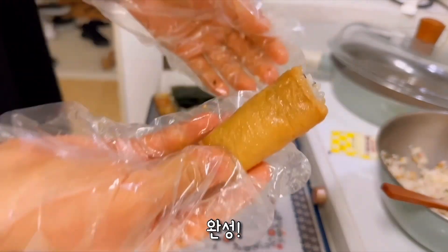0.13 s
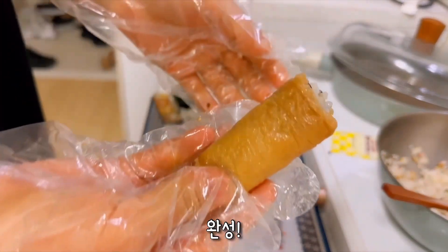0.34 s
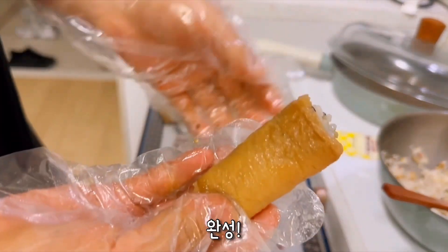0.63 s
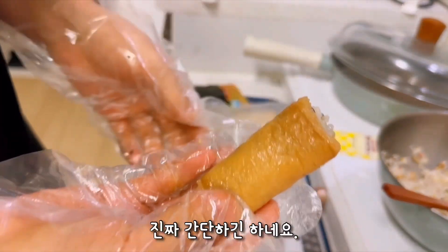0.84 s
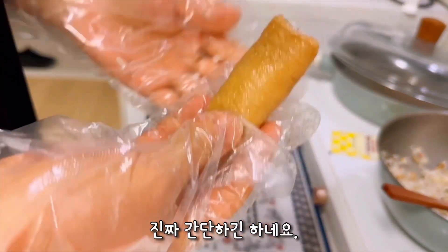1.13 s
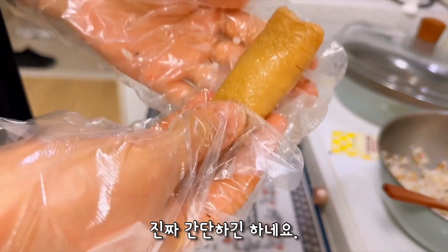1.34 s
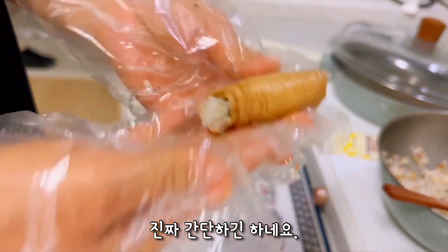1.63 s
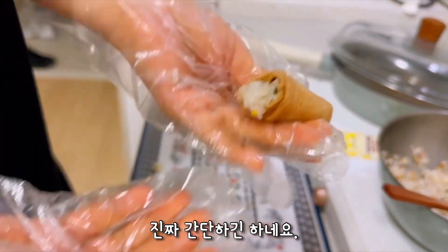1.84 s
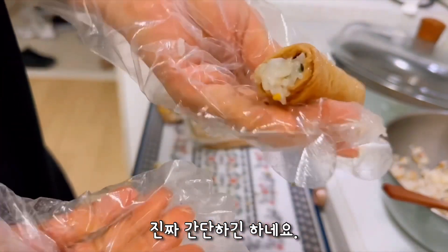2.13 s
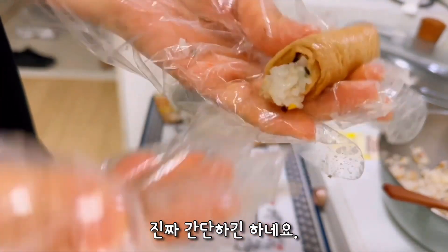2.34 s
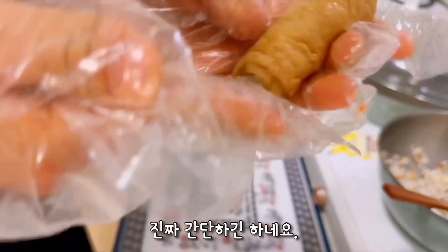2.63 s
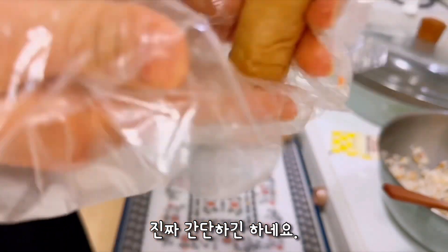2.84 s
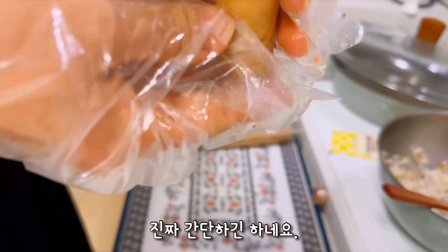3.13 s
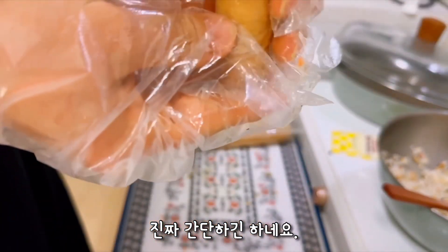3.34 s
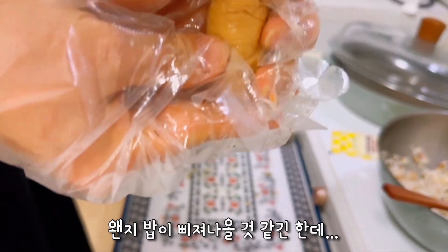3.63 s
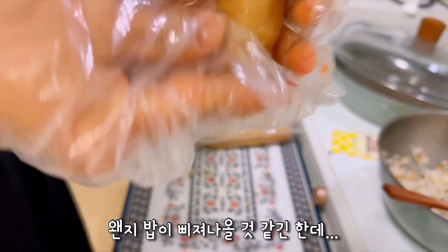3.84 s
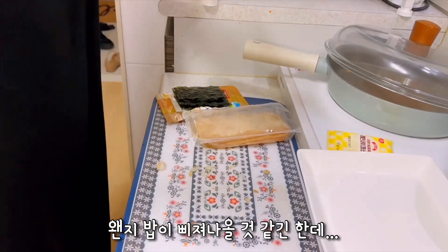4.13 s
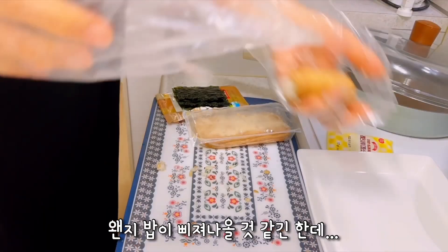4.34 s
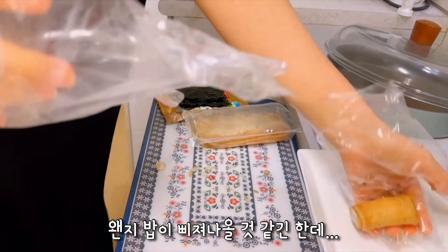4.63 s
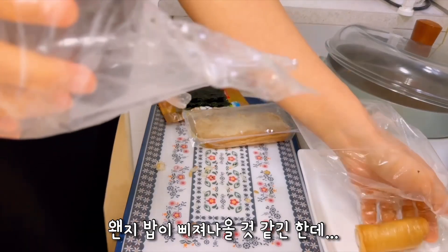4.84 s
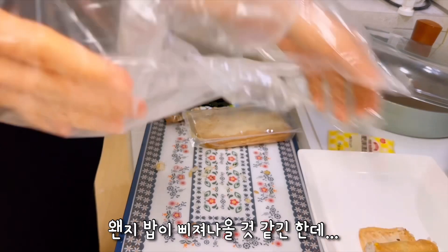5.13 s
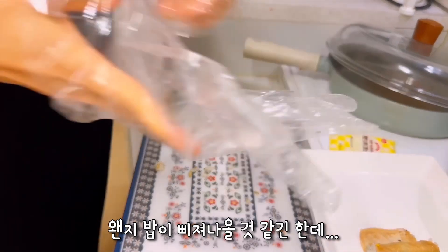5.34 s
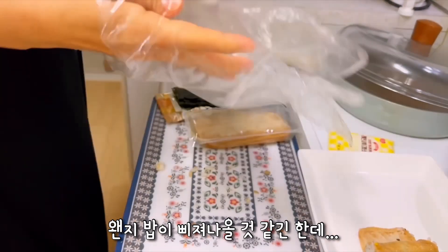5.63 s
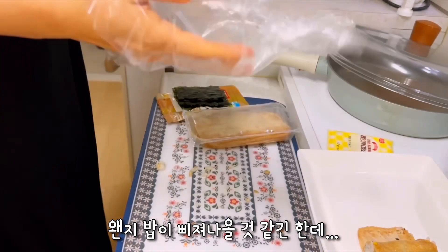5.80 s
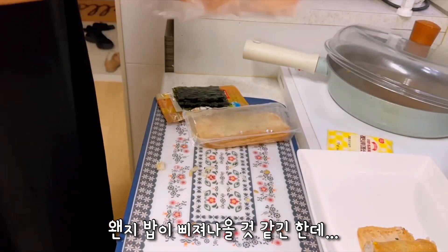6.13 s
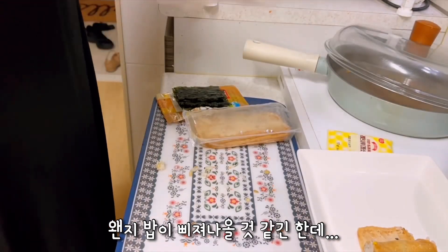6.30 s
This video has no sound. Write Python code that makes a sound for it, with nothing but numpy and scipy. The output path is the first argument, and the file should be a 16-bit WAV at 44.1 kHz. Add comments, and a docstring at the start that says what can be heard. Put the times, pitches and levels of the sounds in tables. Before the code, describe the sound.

Faint low hum, almost alone at first; then close, dry crinkling of disposable gloves in quick uneven strokes, with tiny clicks, sliding hiss, sharp snaps and soft low pats in the palm. Handling thins out past four seconds, a muffled double set of bumps lands on a plate, and the film rustles and flaps louder again. Short room reverberation, wide stereo leaning slightly left.

```python
"""A small kitchen: hands in thin plastic gloves turn a food roll close to the microphone and set it on a plate.
Buckling film sounds as swarms of tiny resonant clicks, with a sliding hiss, and as single sharp snaps;
wide folds rustle, loose folds flap, and damped low tones are the roll dropping against a palm.
The plate answers with two dull groups of bumps, built from decaying modes and short noise slaps.
A low hum of coloured noise lasts throughout; the walls return a short diffuse tail."""
import sys
import numpy as np
from scipy import signal
from scipy.fft import rfft, irfft
from scipy.io import wavfile
from scipy.ndimage import uniform_filter1d

SR = 44100
rng = np.random.default_rng(int(sys.argv[2]) if len(sys.argv) > 2 else 0)


def bounce(signal):
    """Save signal as a 16-bit WAV file at the path given by the first command-line argument."""
    frames = np.transpose(np.atleast_2d(signal))
    limited = np.clip(frames, -1, 1)
    pcm = np.round(limited * 32767).astype(np.int16)
    wavfile.write(sys.argv[1], SR, pcm)


N = 284886
TIME = np.arange(N) / SR
HZ = np.maximum(np.fft.rfftfreq(N, 1 / SR), 1)
USUAL_CRACKLE_DB, USUAL_FOLDS_DB = -44, -45   # levels at the usual pace of handling
HANDLING_FROM_S = 0.9   # until then the roll is held almost still


def from_db(db):
    """Level definition: decibels to amplitude gain."""
    return 10 ** (np.asarray(db) / 20)


def rms_one(x):
    """Normalisation: scale to unit mean power."""
    return x / np.sqrt(np.mean(x ** 2) + 1e-20)


def at_hz(points):
    """Logarithmic frequency scale: interpolate a table along log frequency."""
    hz, value = np.transpose(points)
    return np.interp(np.log(HZ), np.log(hz), value)


def colour(x, spectrum):
    """Linear filtering: multiply the spectrum by a smooth gain."""
    return irfft(rfft(x) * from_db(at_hz(spectrum)), N)


def drift(knots_per_s):
    """Random modulation: straight lines between random knots, at unit power."""
    knots = rng.standard_normal(4000)
    return rms_one(np.interp(TIME * knots_per_s, np.arange(len(knots)), knots))


def pan(left_over_right_db):
    """Intensity stereophony: left and right gains of constant power."""
    halves_db = np.array([[left_over_right_db], [-left_over_right_db]]) / 2
    return rms_one(from_db(halves_db))


def stereo_noise(side_db):
    """Partial coherence: white noise with a common part and an opposed part."""
    mid, side = rng.standard_normal((2, N))
    return rms_one(mid + from_db(side_db) * side * np.array([[1], [-1]]))


def resonate(x, hz, width_hz):
    """Simple resonance: a pole pair with gain 1 at the peak."""
    radius = np.exp(-np.pi * width_hz / SR)
    angle = 2 * np.pi * min(hz, SR / 2) / SR
    zeros = np.array([1, 0, -1]) * (1 - radius * radius) / 2
    poles = [1, -2 * radius * np.cos(angle), radius * radius]
    return signal.lfilter(zeros, poles, x + 1e-18)


def patch_ring(x, hz, damping):
    """Cascaded resonance: a patch of film radiates one band with steep flanks."""
    return resonate(resonate(x, hz, damping * hz), hz, damping * hz)


def buckling(per_s, pace, slide_db, low_hz, high_hz, spectrum, spread_db, scatter_db, order=14):
    """Snap-through instability: a swarm of clicks rings film patches; short-term level is held near 1."""
    chance = per_s * pace * from_db(4 * drift(60)) / SR
    born = np.flatnonzero(rng.random(N) < chance)
    draws = rng.random((N, 4))[born]
    size_db = spread_db * np.minimum(-np.log(draws[:, 0]), 4)
    sizes = from_db(size_db) * np.sign(draws[:, 1] - .5)
    sizes = sizes * np.minimum(pace[born] / .5, 1)   # slow film buckles only gently
    patch = (draws[:, 2] * order).astype(int)
    grains = np.zeros((2, N))
    for k, hz in enumerate(np.geomspace(low_hz, high_hz, order)):
        clicks, mine = np.zeros((2, N)), patch == k
        side = from_db(scatter_db) * (2 * draws[mine, 3] - 1)   # each facet faces its own way
        clicks[:, born[mine]] = sizes[mine] * np.array([1 + side, 1 - side])
        grains += patch_ring(clicks, hz, damping=.7)
    # film sliding on film adds a smooth hiss between the clicks
    hiss = rms_one(colour(stereo_noise(scatter_db - 2.5), spectrum))
    hiss = from_db(slide_db) * np.sqrt(np.clip(pace, .1, 1)) * hiss
    film = rms_one(colour(grains, spectrum)) + hiss
    power = uniform_filter1d(np.mean(film ** 2, axis=0), size=1100)   # over 25 ms
    return film / np.sqrt(power + 1e-9)


# hum spectrum: f/Hz, relative level/dB per Hz
HUM_SPECTRUM = [(15, -38), (30, -14), (50, -1), (70, -1.5), (98, 1), (130, -9), (220, -21.5), (400, -25),
                (1000, -36.5), (2400, -37), (5000, -45), (9000, -53), (16000, -73)]


def hum():
    """Stationary random noise: a steady, mostly coherent, low-frequency spectrum."""
    hum_db = -62
    return from_db(hum_db) * pan(1.6) * rms_one(colour(stereo_noise(-15.5), HUM_SPECTRUM))


# strokes of the hands, each working the film for a moment:
# start t/s, held t/s, crackle level/dB, wide-fold level relative to the crackle/dB
HAND_STROKES = [(0.062, 0.0099, -67.5, -24), (0.925, 0.061, -68, -1), (1.024, 0.011, -46, -9.5),
                (1.218, 0.0063, -48.5, -7), (1.393, 0.13, -42, -9.5), (1.635, 0.062, -43.5, -7.5),
                (1.735, 0.04, -48, -8), (1.842, 0.028, -54.5, -8.5), (2.085, 0.078, -62, -0.5),
                (2.214, 0.073, -48, -8), (2.349, 0.2, -44.5, -7.5), (2.611, 0.0096, -51.5, -2.5),
                (2.744, 0.13, -48.5, -4), (2.941, .015, -48.5, -10), (3.051, .04, -42, -10),
                (3.147, 0.17, -45.5, -5.5), (3.366, 0.089, -51.5, -5.5), (3.526, 0.026, -48, -7),
                (3.681, 0.14, -48.5, -8), (3.827, 0.065, -39, -8.5), (3.998, 0.067, -39, -4.5),
                (4.1, 0.037, -48, -4), (4.17, .1, -54, -4), (4.419, 0.081, -61, 0),
                (4.651, .26, -52.5, -4.5), (4.96, 0.08, -57.5, -1.5), (5.084, .17, -51, -4),
                (5.384, 0.069, -48, -3), (5.454, 0.047, -43.5, -9), (5.591, 0.053, -52, -3.5),
                (5.727, 0.053, -38, -7), (5.834, 0.13, -50, -0.5), (5.939, .075, -43, -7),
                (6.106, 0.028, -41.5, -5), (6.211, 0.011, -47.5, -7), (6.309, 0.097, -35.5, -9.5)]


def handling():
    """Energy summation: strokes build, hold and settle; returns fine-crackle and wide-fold levels in dB."""
    grip_db_per_s, settle_db_per_s = 250.5, 170.5   # a stroke builds quickly; the film settles more slowly
    busy = TIME > HANDLING_FROM_S
    # faint film noise between strokes
    fine = from_db(np.where(busy, -68.5, -90)) ** 2
    wide = from_db(np.where(busy, -72, -75.5)) ** 2
    for start, held, level_db, folds_db in HAND_STROKES:
        before_db = grip_db_per_s * (start - TIME)
        after_db = settle_db_per_s * (TIME - start - held)
        down_db = np.clip(np.maximum(before_db, after_db), 0, 100)
        power = from_db(level_db - down_db) ** 2
        fine = fine + power
        wide = wide + power * from_db(folds_db) ** 2
    return 10 * np.log10([fine, wide])


# how the hands are held: t/s, ring of the cupped palms level/dB,
# top treble facing the microphone level/dB, smooth sliding against buckling level/dB
HAND_POSE = [(0, -10, -1, -3), (.9, -5, -13, -7), (1.6, 2, -7.5, -4), (2.4, -6, -7.5, -12.5),
             (3.0, -3, -8, -7), (3.2, 6, -4, -7.5), (3.5, 8, -11, -4), (3.8, 6.5, -2, -4),
             (4.75, -26, -27, 6), (5.2, -9, -7, -1), (5.8, -1.5, -6, 0), (6.46, 5.5, -8, 3.5)]


def pose():
    """Linear interpolation: palm ring, facing and sliding levels at every sample."""
    s, *columns = np.transpose(HAND_POSE)
    return [np.interp(TIME, s, column) for column in columns]


# fine-facet spectrum: f/Hz, relative level/dB per Hz
CRACKLE_SPECTRUM = [(1500, -7.5), (2600, 1.5), (5500, -2.5), (8000, -3), (10400, 1), (12500, -1),
                    (15000, 2), (16500, -65)]


def crackle(crackle_db, pace, slide_db, facing_db):
    """Directivity: fine facets beam their top treble, so it comes and goes as the film turns."""
    film = buckling(1500, pace, slide_db, 2380, 16700, CRACKLE_SPECTRUM, spread_db=2.1, scatter_db=-3)
    film = from_db(crackle_db) * film
    above_10_khz = signal.butter(2, 10000, "high", fs=SR, output="sos")
    top = signal.sosfiltfilt(above_10_khz, film)
    return film + (from_db(facing_db + 2 * drift(25)) - 1) * top


# wide-fold spectrum: f/Hz, relative level/dB per Hz
RUSTLE_SPECTRUM = [(300, -29), (520, 3), (850, 2), (1150, 2.5), (1650, -2.5), (2200, -6), (3200, -13.5)]


def rustle(folds_db, pace, slide_db, cupped_db):
    """Cavity resonance: wide folds buckle lower in pitch, and the cupped palms ring with them."""
    film = buckling(1300, pace, slide_db, 477, 2740, RUSTLE_SPECTRUM, spread_db=3.0, scatter_db=-1.0, order=10)
    film = from_db(folds_db - 3.5) * film
    return film + from_db(cupped_db) * resonate(film, hz=1676, width_hz=370)


# loose-flap spectrum: f/Hz, relative level/dB per Hz
FLAP_SPECTRUM = [(22, -26), (50, 5), (130, 1), (300, -1), (450, -4), (750, -33)]


def flap(folds_db, pace, slide_db):
    """Size scaling: large loose flaps buckle sparsely in low-frequency patches."""
    follows = 0.98   # share of the folds' swing about their usual level
    flap_db = USUAL_FOLDS_DB + follows * (folds_db - USUAL_FOLDS_DB)
    film = buckling(400, pace, slide_db, 49.5, 510, FLAP_SPECTRUM, spread_db=2.5, scatter_db=-6, order=10)
    return from_db(flap_db - 3) * film


# sharpest creases snapping through:
# t/s, relative level over 1 ms/dB, nominal f/Hz, decay time of the slips/ms
SHARP_CREASES = [(0.212, -48, 3300, 3), (0.5496, -63, 2600, 2.3), (0.655, -67, 7000, 1.7),
                 (0.9016, -48, 7700, 2.1), (1.0169, -30.5, 5800, 1.7), (1.1076, -42, 7300, 2.1),
                 (1.182, -43.5, 5500, 2.3), (1.2245, -34.5, 4770, 1), (1.2651, -45, 6470, 1.9),
                 (1.4047, -36, 7000, .6), (1.53, -32.5, 7550, 1.4), (1.573, -35.5, 6800, 1.3),
                 (1.8376, -36, 10200, 0.96), (1.8876, -43, 5000, 0.65), (1.9184, -45.5, 3650, 1.2),
                 (1.9564, -48.5, 5830, 3.8), (2.0245, -42, 6100, 2), (2.0514, -40.5, 8500, 0.96),
                 (2.1337, -45, 4150, 3.1), (2.198, -35, 8160, 2.1), (2.2049, -30.5, 9000, .4),
                 (2.239, -31, 9600, 0.51), (2.3034, -39, 5170, 1.5), (2.3295, -33.5, 9300, 0.35),
                 (2.3544, -30.5, 7300, 2.5), (2.3958, -25.5, 7040, 0.52), (2.4555, -32, 9500, 0.43),
                 (2.539, -31.5, 6000, 0.28), (2.621, -30.5, 10100, 0.24), (2.6408, -37.5, 3840, 1.9),
                 (2.7387, -37.5, 6560, 1.2), (2.8917, -35, 7200, 2.6), (2.942, -35.5, 8600, 1),
                 (2.9481, -38, 4800, 3), (3.0214, -43, 5050, 0.62), (3.0313, -30.5, 8300, 1.4),
                 (3.0937, -31.5, 6300, 0.51), (3.177, -29, 8850, 1.45), (3.255, -30.5, 10300, 0.34),
                 (3.2933, -32, 7800, 1), (3.318, -29.5, 8800, 0.46), (3.363, -37.5, 1610, 0.67),
                 (3.3972, -32.5, 9250, 0.49), (3.5793, -38.5, 7900, 1.6), (3.6509, -38.5, 2430, 2.3),
                 (3.6867, -32.5, 7800, 1.5), (3.9014, -30.5, 7100, 2.2), (3.9605, -32.5, 7850, .55),
                 (3.9905, -22.5, 7600, 1.16), (4.0386, -33, 7300, 2), (4.221, -42, 7700, 1.3),
                 (4.289, -43.5, 7500, 3.6), (4.419, -49, 4080, 1.9), (4.4925, -45.5, 1300, 0.45),
                 (4.7441, -24, 7240, 0.19), (4.842, -41.5, 2060, 4), (5.1122, -38.5, 7000, 1.7),
                 (5.1384, -40, 6440, 1), (5.199, -39, 6240, 2.1), (5.2964, -40, 10900, 1.8),
                 (5.3425, -42.5, 5850, 1.6), (5.3928, -36.5, 7500, 1.1), (5.458, -34, 1930, 3.8),
                 (5.7278, -24.5, 9250, 1.9), (5.7584, -26, 8900, 0.57), (6.1466, -34, 6300, 2.5),
                 (6.2042, -35.5, 7600, 2.7), (6.311, -29, 7090, 0.75)]


def snaps(lesser, fold_db, knock_db, scatter_db, scatter_s):
    """Stick-slip excitation: a brief run of slips rings the film; the hands scatter the sound at once."""
    ring_ratio, raise_db = 1.102, 2.0   # film ring against nominal pitch; gain of all snaps
    out, t = np.zeros((2, N)), TIME[:700]
    for s, level_db, hz, length_ms in [*SHARP_CREASES, *lesser]:
        slips = rms_one(rng.standard_normal(len(t)) * np.exp(-t / (length_ms / 1000)))
        scattered = rms_one(rng.standard_normal((2, len(t))) * np.exp(-t / scatter_s))
        slips = slips + from_db(scatter_db) * scattered
        # a longer run of slips also shakes the fold around the crease and the whole glove
        fold = from_db(fold_db) * rms_one(resonate(slips, .5 * hz, 0.2 * hz))
        knock = from_db(knock_db) * rms_one(patch_ring(slips, 1510, damping=1.0))
        snap = rms_one(patch_ring(slips, hz * ring_ratio, damping=.85))
        snap = snap + length_ms * (fold + knock)
        # small bright creases tend towards the middle, larger and duller ones further left
        side_db = 1.5 + 1.5 * np.log2(7500 / hz) + rng.standard_normal()
        over_1_ms = np.sqrt(SR / 1000 / len(t))   # the energy of 1 ms at the stated level
        at = round(s * SR)
        out[:, at:at + len(t)] += pan(side_db) * from_db(level_db) * rms_one(snap) * over_1_ms
    return from_db(raise_db) * out


def small_creases(crackle_db, per_s, above_db, spread_db):
    """Random point process: lesser creases as rows like the sharp ones, level following the crackle."""
    chance, size, pitch, length = rng.random((round(per_s * N / SR), 4)).T
    s = chance * (N - SR // 50) / SR
    around_db = np.interp(s, TIME, crackle_db)
    # gentle handling leaves the creases standing further out of the crackle
    gentle_db = -.15 * (around_db - USUAL_CRACKLE_DB)
    level_db = around_db + above_db + spread_db * size ** 2 + gentle_db
    rows = np.transpose([s, level_db, 3000 * 3.2 ** pitch, 0.24 + 3.36 * length])
    return rows[s > HANDLING_FROM_S]


# the roll drops softly against a palm: t/s, level/dB, f/Hz
PALM_PATS = [(2.355, -41, 198), (2.361, -46, 70), (2.865, -42.5, 190), (2.877, -40, 98),
             (2.914, -44.5, 170), (4.001, -39, 70), (4.055, -36.5, 120), (4.418, -48, 342),
             (4.931, -38, 223), (5.74, -37, 159), (5.915, -39, 205), (6.140, -37, 100)]


def pats(ring_s):
    """Heavy damping: flesh lets each low tone swell and die within a few cycles."""
    out, t = np.zeros(N), TIME[:SR // 8]
    for s, level_db, hz in PALM_PATS:
        at = round(s * SR)
        swell = t / ring_s * np.exp(1 - t / ring_s)   # peaks at 1 after ring_s
        out[at:at + len(t)] += from_db(level_db) * swell * np.sin(2 * np.pi * hz * t)
    return out


# roll and fingers meet the plate: t/s, thud level/dB, slap level/dB
PLATE_BUMPS = [(4.649, -50, -42), (4.654, -35, -59), (4.666, -39.5, -57), (4.698, -48, -66),
               (4.909, -48, -43), (4.922, -47, -34), (4.933, -36, -56), (4.976, -37, -51),
               (5.018, -45.5, -57), (5.066, -58, -49)]
# modes of the plate on the counter: f/Hz, relative level/dB, 60 dB decay time t/s
PLATE_MODES = [(217.2, -2.5, 0.18), (252, -8, 0.21), (266.1, 3.5, 0.14), (287, 1, 0.16), (390, -10, 0.084),
               (740, -17, 0.035), (917, -11, 0.049)]
# slap spectrum: f/Hz, relative level/dB per Hz
SLAP_SPECTRUM = [(150, -4.5), (400, 0), (750, 3), (1050, -2), (1500, -13.5), (4000, -45), (12000, -41)]


def plate(contact_s, slap_s):
    """Modal superposition: soft blows ring the plate's low modes, each with a short moist slap."""
    thuds, slaps = np.zeros(N), np.zeros(N)
    for s, thud_db, slap_db in PLATE_BUMPS:
        at = round(s * SR)
        t = TIME[:N - at][:SR // 2]
        ring = sum(from_db(db - 60 * t / t60) * np.sin(2 * np.pi * hz * t) for hz, db, t60 in PLATE_MODES)
        soft_onset = 1 - np.exp(-t / contact_s)
        thuds[at:at + len(t)] += from_db(thud_db) * ring * soft_onset
        slaps[at:at + len(t)] += from_db(slap_db) * np.exp(-t / slap_s)
    slap_noise = rms_one(colour(stereo_noise(-7.5), SLAP_SPECTRUM))
    return pan(2.4) * (thuds + slaps * slap_noise)


def kitchen(x, room_db, t60_s, order=8):
    """Diffuse-field decay: in each band, noise follows the dying energy returned by the walls."""
    edges, tail = np.geomspace(300, 16000, order + 1), 0
    keep = from_db(-120 / (t60_s * SR))   # energy, so 60 dB down after t60_s
    white = rng.standard_normal((2, N))
    for low, high in zip(edges, edges[1:]):
        band = signal.butter(2, [low, high], "band", fs=SR, output="sos")
        power = np.mean(signal.sosfilt(band, x) ** 2, axis=0)
        energy = signal.lfilter([1 - keep], [1, -keep], power)
        white = np.roll(white, SR // 2, axis=1)
        noise = rms_one(signal.sosfilt(band, white))
        tail = tail + np.sqrt(energy) * noise / np.hypot(1, low / 9000)   # weaker in the treble
    return x + from_db(room_db) * tail


def scene():
    """Superposition: faster handling makes the film louder and denser in clicks."""
    jerks_db = 1.2 * drift(45)   # the film catches and lets go
    crackle_db, folds_db = handling() + jerks_db
    cupped_db, facing_db, slide_db = pose()
    pace = from_db(.6 * (crackle_db - USUAL_CRACKLE_DB))
    fine = pan(0.9) * crackle(crackle_db, pace, slide_db, facing_db)
    wide = pan(4.5) * rustle(folds_db, pace, slide_db, cupped_db)
    low = pan(3.5) * (flap(folds_db, pace, slide_db) + pats(ring_s=0.0036))
    lesser = small_creases(crackle_db, per_s=32, above_db=4, spread_db=6)
    creases = snaps(lesser, fold_db=-8, knock_db=-16, scatter_db=-7, scatter_s=.005)
    sources = fine + wide + low + creases + plate(contact_s=0.0071, slap_s=0.0086)
    return kitchen(sources, room_db=-10, t60_s=0.2) + hum()


# how much louder the left microphone port hears: f/Hz, level/dB
PORT_LEVEL_DIFFERENCE = [(250, 0), (550, 3), (1200, -0.4), (4000, 3.5), (6500, 2.5), (9000, -0.5),
                         (14000, -1.5)]
# how far the left port leads the right: f/Hz, phase/rad
PORT_PHASE_LEAD = [(100, 0), (2000, .15), (3500, .7), (5600, .3), (7200, 1.3), (8200, 2.8), (9700, .4),
                   (11000, .15), (13700, .2), (15500, 1.6)]
# microphone colour: f/Hz, level/dB
MIC_RESPONSE = [(4000, 0), (7500, -.5), (9200, -.5), (10400, 2), (12000, 0), (15000, 0)]


def record(dry):
    """Interchannel difference: the ports hear unequal levels and phases, and the top is cut."""
    lead = np.clip(at_hz(PORT_PHASE_LEAD), -np.pi, np.pi)
    difference = from_db(at_hz(PORT_LEVEL_DIFFERENCE)) * np.exp(1j * lead)
    ports = difference ** np.array([[.5], [-.5]])   # half to each port, in opposite senses
    heard = colour(irfft(rfft(dry) * ports, N), MIC_RESPONSE)
    top_cut = signal.ellip(10, .1, 70, 16400, fs=SR, output="sos")
    return signal.sosfilt(top_cut, heard)


dry = scene()
out = record(dry)
bounce(out)
```